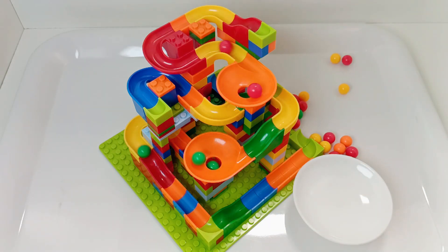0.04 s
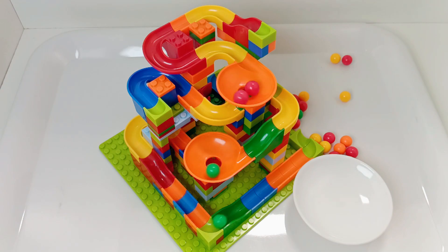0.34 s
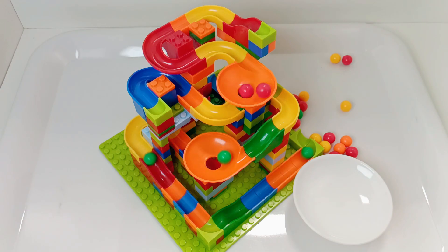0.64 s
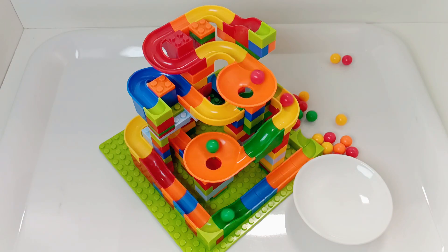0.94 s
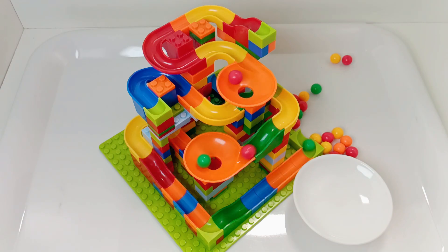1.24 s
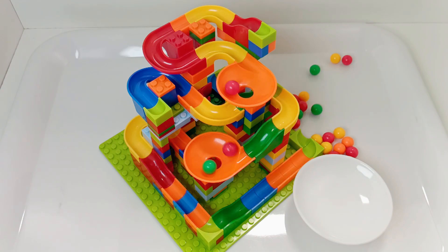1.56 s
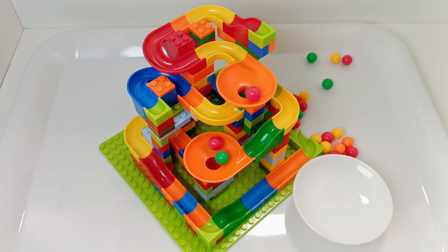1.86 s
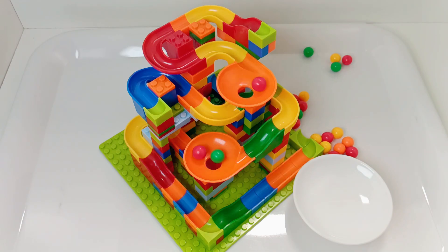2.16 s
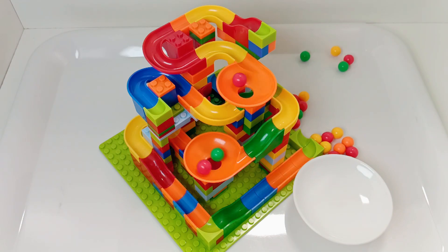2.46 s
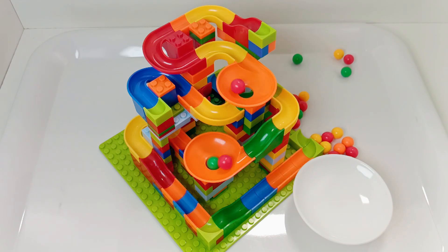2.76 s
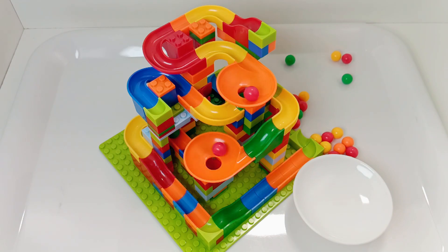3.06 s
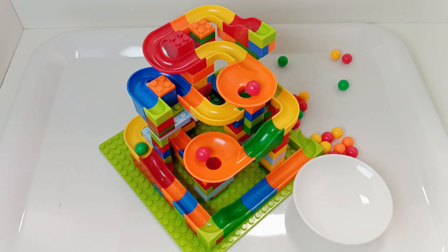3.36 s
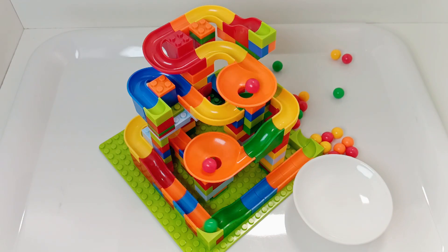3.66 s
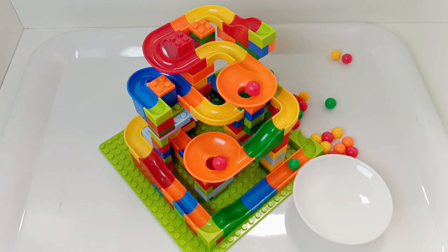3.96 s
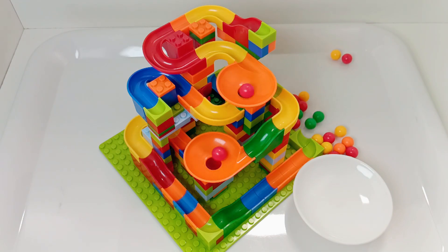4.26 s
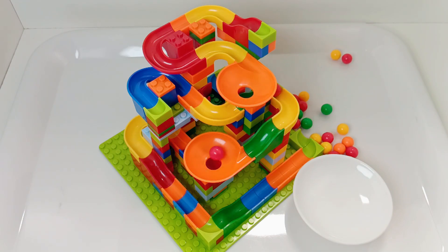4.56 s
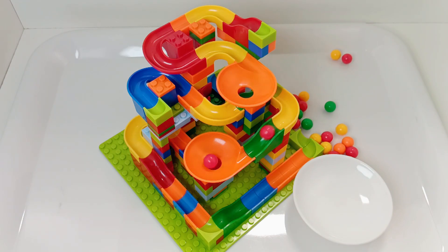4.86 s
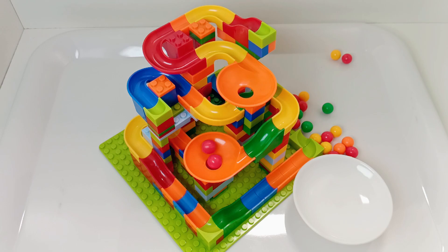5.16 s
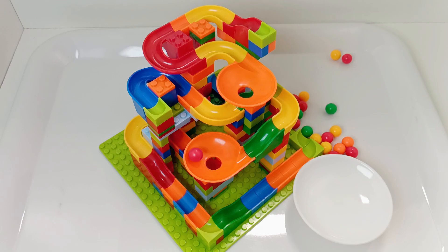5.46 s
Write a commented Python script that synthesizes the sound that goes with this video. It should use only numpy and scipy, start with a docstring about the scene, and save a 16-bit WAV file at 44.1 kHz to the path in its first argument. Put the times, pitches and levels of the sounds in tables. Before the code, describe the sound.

Light marbles run down a plastic toy tower standing in a plastic tub, heard close and slightly to the left in a small, quiet room. At the start one bounces through a funnel, and quick ticks and a rolling rattle follow along the chutes. Sharp clashes come at about 0.8 and 1.35 seconds, and marbles hit a heap with a brief buzzing crash at 0.9 and 1.5 seconds. From 1.7 to 2.7 seconds there is only soft circling with faint ticks. Near 2.9 seconds a marble clatters through a funnel, and the ticking grows busy again until another crash into the heap at 4.3 seconds. A few hard, bright knocks at 4.5 to 4.7 seconds mark a drop through a funnel hole. From 5 seconds marbles whirl and clack together, with one more fall at 5.3. Underneath, the hollow plastic hums faintly.

```python
"""In a small room, light marbles run down a plastic toy tower that stands in a plastic tub.
They circle and clash in the funnels, tick over the joints of the chutes, drop through a funnel's hole
and shoot into a heap of marbles that buzzes on the tub's floor. Each knock makes the plastic ring at
its own pitches (its modes). Rolling is a stream of tiny bumps that shakes the same plastic.
Underneath, the walls whirr, the hollow blocks hum and the tub booms faintly."""
import sys
import numpy as np
from scipy import signal
from scipy.fft import rfft, irfft
from scipy.io import wavfile
from scipy.ndimage import uniform_filter1d, map_coordinates

SR = 44100
rng = np.random.default_rng(int(sys.argv[2]) if len(sys.argv) > 2 else 0)


def dump(signal):
    """Clip the signal to [-1, 1] and save it as 16-bit WAV at the path in sys.argv[1]."""
    limited = np.clip(np.atleast_2d(signal).T, -1, 1)
    pcm = np.round(limited * 32767).astype(np.int16)
    wavfile.write(sys.argv[1], SR, pcm)


N = 247401
RING_SIZE, KNOCK_SIZE = int(.2 * SR), int(.012 * SR)   # samples in a whole knock, and in its first snap
TIME = np.arange(N) / SR
AGE = np.arange(RING_SIZE) / SR   # seconds since a knock
# Four ranges of pitch, low to high, called body, clack, crack and sparkle.
BANDS = [signal.butter(4, 2200, "low", fs=SR, output="sos"),
         signal.butter(3, [2200, 5000], "band", fs=SR, output="sos"),
         signal.butter(4, [5000, 8000], "band", fs=SR, output="sos"),
         signal.butter(8, 8000, "high", fs=SR, output="sos")]


# Marbles clash in a funnel. Level is the clack's; hardness is clack over body, crack is crack over
# clack, sparkle is sparkle over crack, pan is left over right. The struck spot has a low and a high note.
# start_s, level_db, hardness_db, crack_db, sparkle_db, pan_db, low_hz, low_db, high_hz, high_db
FUNNEL_CLASHES = [(0.788, -25, 4.5, -15.5, 4, 2.5, 1214, -1, 3960, -2),
                  (0.805, -24, 4.5, -4.5, -8, 5.5, 1236, -1, 4020, 4),
                  (1.344, -31.5, 2.5, 2.5, -4.5, 3, 2660, 6, 5120, -2),
                  (1.355, -21.5, 13, -20, -5, 7.5, 2636, 25, 3300, -7),
                  (2.155, -44.5, -3.5, -8.5, -19, 4, 2360, 12, 5050, -2),
                  (2.573, -48, 3, -16.5, -24, 6.5, 2360, 14, 4120, -1),
                  (2.782, -52.5, 2, -15, 9, 10, 1520, 8, 3340, 19),
                  (2.824, -43.5, 2, -2.5, -2.5, 14, 1833, 1, 5880, -9),
                  (2.836, -38.5, 7, -0.5, -8, 18, 1920, 20, 5870, -8),
                  (3.019, -40, 4, -15, -13, 4, 2590, 9, 3524, 10),
                  (5.025, -43.5, 2, 1.5, -8, 1, 1565, 10, 5090, 13.5),
                  (5.112, -40, -2, -25, -1, 2, 1560, 26, 3415, 10),
                  (5.132, -44.5, -4, 0.5, -6.5, 6, 1492, 28, 5100, 11),
                  (5.162, -41.5, 8, -11, 0, -2, 1390, 12, 3180, 11),
                  (5.186, -32.5, 0, -3.5, -4.5, 3, 1907, 11, 5360, -1),
                  (5.302, -42, 23, 1, -5.5, 1, 3100, -3, 3440, 23),
                  (5.428, -35, 11, -8, -9, 6, 2685, 7, 3400, 4),
                  (5.457, -33, 7.5, -6.5, -5, 3, 2690, -6, 4085, 2),
                  (5.495, -38, 3, -5, -8.5, 2.5, 2630, 4, 3427, -4),
                  (5.542, -38, -2, -6.5, -10, 5.5, 1900, 3, 4380, 8),
                  (5.561, -34.5, 1, -19, -17, 1, 1724, 1, 4040, 7)]
# Falls through the lower funnel:
# start_s, level_db, rebound_after_s, rebound_db, last_bounce_after_s, last_bounce_db, pan_db
FUNNEL_FALLS = [(0.067, -27.5, 0.016, -23.5, 0.049, -29, 4), (2.868, -28.5, 0.0075, -26.5, 0.047, -23.5, 5),
                (5.339, -29, 0.0155, -23.5, 0.052, -27.5, 1)]
# The four touches of a fall: hardness_db, crack_db, sparkle_db, low_hz, low_db, high_hz, high_db
FALL_TOUCHES = [(2, -4.5, -4, 1900, -3.5, 3480, -9), (3, -4.5, -5.5, 1880, -4.5, 3480, 8.5),
                (6, -7.5, -2, 2680, -1.5, 7600, 11), (8, -4.5, -8.5, 2690, -8, 3800, 9)]
# A funnel's main modes (wider ones die sooner): pitch_hz, base_width_hz, level_db
FUNNEL_MODES = [(928, 27, -3.5), (1359, 28, 0), (1497, 35, -5), (1582, 30, -0.5), (1808, 65, 4),
                (1929, 81, 4), (2226, 50, -12.5), (2650, 44, -8), (3260, 32, -5.5), (3413, 60, 5),
                (3490, 50, 3), (3810, 37, -11.5), (4080, 23, -5), (5030, 55, -18.5), (5560, 50, -11.5),
                (5500, 65, -17), (6940, 90, -7), (9700, 120, -22)]
# Its crowd of weaker modes, heard as one tone colour: pitch_hz, level_db
FUNNEL_COLOUR = [(180, -62.5), (300, -26), (555, -28), (930, -17.5), (1170, -0.5), (1900, -1), (2140, -2.5),
                 (2700, 2.5), (3030, -1.5), (3520, 2), (3890, -3), (5900, -4), (7570, -11.5), (9710, -23.5),
                 (16000, -38.5)]
def funnel_clashes():
    """Marbles clash in the funnels; a falling one lands, rebounds twice quickly and bounces once more."""
    landings = []
    for start_s, db, rebound_s, rebound_db, last_s, last_db, pan_db in FUNNEL_FALLS:
        touches = [(start_s, db), (start_s + rebound_s, rebound_db),
                   (start_s + rebound_s + 0.005, rebound_db), (start_s + last_s, last_db)]
        for touch, tone in zip(touches, FALL_TOUCHES):
            landings.append((*touch, *tone[:3], pan_db, *tone[3:]))
    return knocks(landings + FUNNEL_CLASHES, FUNNEL_MODES, FUNNEL_COLOUR, ripple_db=3.5, modes_db=-5.5,
                  narrowing=0.4, note_width=42, crack_fade=0.044, snap=0.19,
                  tail_db=-10.5, tail_fade_s=0.14, rise=0.0015)


# Ticks at the joints:
# start_s, level_db, hardness_db, crack_db, sparkle_db, pan_db, low_hz, low_db, high_hz, high_db
CHUTE_TICKS = [(0.026, -43.5, 0, 3.5, -3, 4, 1540, 7, 6700, 4),
               (0.2, -40.5, 4, -6.5, 4, 3, 1790, 0, 3430, -4),
               (0.251, -35.5, 2, -6.5, -7, 6, 2700, -12, 3480, 3),
               (0.285, -34.5, 4, -16, 1.5, 5, 2610, -1, 3500, -4),
               (0.332, -36.5, 0, -4.5, -4, 2, 1860, 5, 5000, 3),
               (0.355, -33.5, -1, -0.5, -10, 9, 1625, 1, 5080, 6),
               (0.376, -35.5, 5, -13, -9, 1, 1975, 2, 3480, 2),
               (0.388, -32, 8, -1.5, -12, 5.5, 2350, -16, 5710, 10),
               (0.506, -41.5, 6, -25, -14, 4, 2260, 12, 3220, 7),
               (0.541, -27.5, 11, 1.5, -7.5, 5, 2650, 1, 5990, -2.5),
               (0.653, -36.5, 9, -9, -12, 1, 2140, -2, 4280, 4),
               (0.712, -37.5, 7, -2.5, -5, 3, 2355, 17, 3820, -5),
               (0.728, -28.5, 5.5, -7.5, -2, 7, 2620, -3, 4160, -9),
               (0.74, -35.5, 0, 0, -6, 1, 2680, -2, 4070, -2),
               (0.833, -34, 10, -2, -9, 1, 2780, -13, 3880, -5),
               (0.853, -29, 0, -6.5, -9, 3.5, 2270, -7, 3110, -7),
               (1.067, -42, 10, -16, -8, 2, 2270, 11, 3420, -2),
               (1.111, -27.5, 25, -2.5, -8, 5, 2250, -1.5, 3520, -4),
               (1.185, -37.5, 4.5, -17, -9, 7, 2650, 6, 3330, 14),
               (1.249, -41.5, 16, -8, -10, 4, 2410, 16, 3725, 1),
               (1.267, -37, 7, -3.5, -14, 2.5, 2330, 9, 6000, 0),
               (1.294, -33.5, 4, -3, -8, 5, 2600, -10, 4370, 2),
               (1.416, -35.5, -1, -5, -12.5, 5, 2310, -7, 3910, 2),
               (1.661, -54.5, 11.5, -11, -10, 2, 2290, 0, 3130, 1),
               (1.929, -55.5, -8.5, -7, -17.5, 3.5, 1930, 9, 5990, 10),
               (1.962, -57.5, -13, -22, -13.5, 7, 1940, 13, 3570, 4),
               (1.975, -49.5, -9.5, -13.5, -11, 5.5, 1825, 2, 3600, 15.5),
               (2.259, -62, 10, -9.5, 3.5, -1, 1900, -3, 3620, -6.5),
               (2.378, -54.5, 3, -29.5, -9, 8.5, 2985, 14, 3020, 0),
               (2.718, -61.5, -11, -10.5, 5.5, 5.5, 1885, 12, 3450, -7),
               (3.051, -38, 3.5, -5, -20.5, 4, 2680, 10, 5200, 13),
               (3.065, -38, -2.5, -11, 1, 6, 2920, 2, 3400, 1),
               (3.097, -37, 3, -10, -7, 4, 2665, 5, 3970, -11),
               (3.136, -40.5, -6, -11, 1.5, 6, 1750, -9, 3370, -2),
               (3.155, -31.5, 5, -7, -12, 5, 1810, 2, 3340, -1),
               (3.235, -46.5, -1, -19, -4, 4.5, 2930, 8.5, 4400, 5),
               (3.317, -56.5, -6, -19, -14, 1, 2320, 12.5, 3265, -7),
               (3.364, -54.5, -3, -29, -11.5, 5.5, 2840, 10.5, 3220, 1),
               (3.458, -42.5, 3, -16.5, 7, 8, 2880, 2, 4430, 4),
               (3.485, -38.5, 1.5, -6, -12, 2.5, 1330, 6, 3310, 3),
               (3.581, -46, -8, -22, 1, 10, 1830, 15, 8200, -4),
               (3.6, -32.5, 0, -7, -1.5, 5, 2680, 23, 8340, 14),
               (3.608, -40.5, 9, -19, -11, 14, 2660, 2, 3220, 4),
               (3.676, -38.5, 8, 0, -3.5, 5.5, 2330, 10, 4180, 0),
               (3.722, -37, 7, -15, -10, 11, 2290, -3, 3750, -6),
               (3.734, -30, 16, -8.5, -14.5, 5, 2305, 12, 3640, 7),
               (3.772, -37.5, 10, -24, -20, 3, 2340, -6, 3590, 1),
               (3.79, -48, 18, -26.5, -24, -1, 2505, 12, 3560, -2),
               (3.872, -45, -2, -22, 4, 10, 2340, 17, 3750, -4),
               (3.894, -29.5, 11, -3.5, -11.5, 6, 2670, -3, 4540, -2),
               (3.964, -37, 6, -11, -13, 7, 2650, 1, 3190, 9),
               (3.982, -36.5, 5.5, -14, -20, 4, 1405, 21, 3250, 24),
               (4.012, -36.5, 9, -7.5, -9, 5, 2350, 11, 4450, 10),
               (4.066, -32.5, 5.5, -2, -12.5, 0.5, 2350, 1, 3790, 2),
               (4.096, -34.5, 0, -4.5, -7, 5, 2370, -9, 4660, 2),
               (4.113, -41, 9, -5, -10, 3, 1880, -1, 4300, 5),
               (4.147, -39, -1, -9, -6, 0, 2970, 4, 5000, -3),
               (4.161, -28.5, 16, -9, -10, 5.5, 2800, 6.5, 3280, -6),
               (4.226, -28, 1.5, -5, -9.5, 2.5, 1550, -8, 6240, -9)]
# A chute's main modes: pitch_hz, base_width_hz, level_db
CHUTE_MODES = [(1390, 35, 1), (1542, 48, 6), (1940, 85, 5.5), (2169, 40, -8.5), (2328, 35, 5.5),
               (2700, 35, 3), (2764, 16, -2), (2960, 45, 1), (3180, 69, -6.5), (3800, 50, -6.5),
               (4180, 40, -8.5), (4060, 70, -9), (5620, 95, -10.5), (5940, 150, -5), (6960, 79, -10.5)]
# Its crowd of weaker modes: pitch_hz, level_db
CHUTE_COLOUR = [(180, -78.5), (300, -67), (360, -34), (624, -47.5), (787, -10), (1100, -10), (1390, -3),
                (2360, -1.5), (2700, -3), (4300, -4.5), (5160, -14), (6000, -9.5), (8220, -17),
                (9710, -21.5), (12500, -40.5), (16000, -40)]
def chute_ticks(strays):
    """Marbles tick over the joints of the chutes; the stray ticks ring the same plastic."""
    return knocks(CHUTE_TICKS + strays, CHUTE_MODES, CHUTE_COLOUR, ripple_db=2.0, modes_db=-6,
                  narrowing=0.18, note_width=32, crack_fade=0.049, snap=0.18,
                  tail_db=-23.5, tail_fade_s=.16, rise=0.0013)


def stray_ticks(rolling_gain, count):
    """Table rows for faint ticks at random moments, stronger when the rolling is louder."""
    when, strength = rng.random((count, 2)).T
    times = (np.arange(count) + when) / count * TIME[-1]
    levels_db = 20 * np.log10(np.interp(times, TIME, rolling_gain)) - 7 + 5 * (strength - .5)
    hardness_db, crack_db, sparkle_db, pan_db = 2, -12, -12, 4
    return [(s, db, hardness_db, crack_db, sparkle_db, pan_db) for s, db in zip(times, levels_db)]


# Knocks in the upper funnel's hole:
# start_s, level_db, hardness_db, crack_db, sparkle_db, pan_db, low_hz, low_db, high_hz, high_db
HOLE_DROPS = [(4.516, -21, 16, -2.5, -5.5, 5.5, 2940, 1, 3970, -1.5),
              (4.58, -23, 15, -4, -1.5, 5, 2870, 9, 4020, -4),
              (4.61, -26, 6, -13, -3, 1.5, 2893, 13.5, 4120, -6),
              (4.666, -36.5, 13, -13.5, -5, 7, 2670, 14, 4020, -8),
              (4.864, -42, 1.5, -19, -22, 2, 1830, -3, 4010, -0.5),
              (4.877, -36, 6.5, -11.5, -17, 8, 1880, 1, 4030, -4.5),
              (4.93, -53, 6, -27, -11, -6, 3080, 21, 3300, 5)]
# The main modes of the plastic there: pitch_hz, base_width_hz, level_db
HOLE_MODES = [(1415, 30, 4), (2110, 40, 10), (2900, 90, -14), (3960, 60, 10), (4060, 50, 6.5),
              (4680, 160, 0.5), (5970, 300, 7), (6640, 200, -13), (7300, 150, -10), (9100, 120, -7),
              (9700, 120, -18)]
# Its crowd of weaker modes: pitch_hz, level_db
HOLE_COLOUR = [(180, -64.5), (300, -46), (667, -16), (1040, -20.5), (1230, -2), (2480, -6.5), (2930, -3),
               (3400, -3.5), (4100, 1.5), (5200, -8), (6800, -4.5), (8000, -17.5), (9000, -6), (9900, -7),
               (11700, -23.5), (16000, -23)]
def hole_drops():
    """A marble drops through the upper funnel with a few hard, bright knocks, then softer ones."""
    return knocks(HOLE_DROPS, HOLE_MODES, HOLE_COLOUR, ripple_db=5.0, modes_db=-9.0,
                  narrowing=0.46, note_width=59, crack_fade=0.029, snap=0.81,
                  tail_db=-14.5, tail_fade_s=0.21, rise=0.0023)


# Crashes into the heap, too crowded for a single note:
# start_s, level_db, hardness_db, crack_db, sparkle_db, pan_db
HEAP_HITS = [(0.899, -23, 1, 1, -6.5, 4), (0.953, -32, 1.5, -12, -19, 4.5), (1.457, -23.5, 1, 2, -7, 4),
             (4.269, -23, -1, 1.5, -6.5, 3), (4.37, -38.5, -1, -1.5, -12.5, 4.5)]
# The main modes that a crash rings: pitch_hz, base_width_hz, level_db
HEAP_MODES = [(1090, 48, -8.5), (1513, 100, 11), (1970, 100, 5), (2310, 70, 3.5), (2990, 90, -7),
              (3880, 150, -3), (5450, 120, -3.5), (6370, 150, 7.5)]
# The crowd of weaker modes: pitch_hz, level_db
HEAP_COLOUR = [(180, -47), (300, -31.5), (392, -15.5), (546, -23), (978, 3), (1100, -2.5), (1560, 7),
               (2200, 4.5), (3080, 3), (4600, 0), (6500, -1.5), (8000, -1.5), (10500, -16), (12700, -16),
               (15200, -21), (16000, -28)]
def heap_crashes():
    """A marble hits the heap; the jostled marbles buzz on the tub's floor and each other, then settle."""
    settling = np.exp(-(AGE / 0.075) ** 2)
    buzz = from_db(-14.5) * chatter(bounce_s=0.0028, rough_db=3.0) * settling
    return knocks(HEAP_HITS, HEAP_MODES, HEAP_COLOUR, ripple_db=0.0, modes_db=-10.0, narrowing=0.36,
                  crack_fade=0.047, snap=0.9, tail_db=-36.5, tail_fade_s=.25, rise=0.002, buzz=buzz)


def knocks(table, modes, colour, ripple_db, modes_db, narrowing, crack_fade, snap,
           tail_db, tail_fade_s, rise, note_width=None, buzz=0):
    """A knock is a burst of crowded modes, the main modes, any spot notes and a tail from the tower."""
    out = np.zeros((2, N + RING_SIZE))
    # A brief boost for each upper band: the treble is spent soonest.
    snaps = (1, 1 + 0.045 * snap * dying(0.039), 1 + snap * dying(0.047), 1 + (1 + snap) * dying(0.019))
    tail = from_db(tail_db) * dying(tail_fade_s)
    for start_s, level_db, hardness_db, crack_db, sparkle_db, pan_db, *spot in table:
        bands_db = level_db + np.array([-hardness_db, 0, crack_db, crack_db + sparkle_db])
        # A weak or soft, glancing blow builds up more slowly and lingers.
        stretch = np.interp(max(bands_db), [-45, -27], [1.7, 1])
        stretch *= np.interp(hardness_db, [0, 16], [1.25, 0.9])
        onset = 1 - np.exp(-(AGE / (rise * stretch)) ** 2)
        fade = np.sqrt(dying(crack_fade * stretch) ** 2 + tail ** 2 + buzz ** 2)
        noise = rng.standard_normal((2, RING_SIZE))
        crowd = rms_one(noise * fade * chatter(bounce_s=0.0016, rough_db=-1.5))
        burst = crowd + spot_notes(spot, note_width)
        shell = rms_one(coloured(burst, spot_colour(colour, ripple_db, count=110)))
        knock = onset * (shell + from_db(modes_db) * ringing(modes, narrowing, scatter_db=8.5))
        at = round(start_s * SR)
        for band, db, sharpen, lean_db in zip(BANDS, bands_db, snaps, (.5, 0.22, -1.0, -1.0)):
            part = signal.sosfilt(band, knock + 1e-18) * sharpen
            strength = from_db(db) / part[:, :KNOCK_SIZE].std()
            out[:, at:at + RING_SIZE] += strength * part * panned(pan_db + lean_db)
    return out[:, :N]


def ringing(modes, narrowing, scatter_db):
    """Modes ring after one touch; the spot touched sets each one's strength and phase at either ear."""
    hz, width, db = np.transpose(modes)[:, :, None]
    width = np.clip(width * narrowing, 14 + hz / 220, 400)   # plastic damps its high modes quickly
    strength = from_db(db + scatter_db * rng.standard_normal((len(hz), 2))) * width
    phases = rng.random((len(hz), 1)) + rng.random((len(hz), 2)) / 2
    age = AGE[:RING_SIZE // 2]
    fading_tones = np.exp((2j * np.pi * hz - np.pi * width) * age)
    rings = ((strength * np.exp(2j * np.pi * phases)).T @ fading_tones).real
    return rms_one(np.pad(rings, ((0, 0), (0, RING_SIZE - len(age)))))


def spot_notes(spot, base_width):
    """Each note of the struck spot is a short hollow knock and a longer ping; high pings die sooner."""
    share = 1000 / (SR / 2)   # a note of 0 dB is about as strong as 1 kHz of the crowd around it
    notes = 0
    for hz, db in zip(spot[::2], spot[1::2]):
        ping = ringing([(hz, base_width * np.sqrt(hz / 2000), 0)], narrowing=1.0, scatter_db=2.0)
        knock = from_db(-1.5) * ringing([(hz, 170, 0)], narrowing=0.92, scatter_db=1.5)
        notes += from_db(db) * np.sqrt(share) * (ping + knock)
    return notes


def spot_colour(colour, ripple_db, count):
    """Every spot on the plastic favours different pitches, most of all in the treble."""
    hz, db = np.transpose(colour)
    grid = np.geomspace(hz[0], hz[-1], count)
    ripple = ripple_db * np.interp(grid, [1000, 8000], [0.6, 1.4]) * rng.standard_normal(count)
    return np.column_stack([grid, np.interp(np.log(grid), np.log(hz), db) + ripple])


def chatter(bounce_s, rough_db):
    """A light marble never lands just once: the contact flutters in tiny bounces."""
    return from_db(rough_db * np.interp(AGE / bounce_s, np.arange(512), rng.standard_normal(512)))


# Marbles circling in the funnels: time_s, level_db, brightness_db
FUNNEL_CIRCLING = [(0, -37, -2.5), (0.22, -46, 2), (0.38, -40.5, -20), (0.55, -47.5, 1), (1.2, -53, 0.5),
                   (1.55, -41, -19), (1.7, -51.5, -7), (2.1, -54.5, -14.5), (2.72, -59, -13),
                   (2.85, -43, -4), (3.02, -56.5, 7.5), (3.28, -55, -13.5), (3.85, -55, -41),
                   (4.33, -45, 1), (4.5, -44.5, 2.5), (4.7, -47, -1.5), (4.82, -59.5, -11),
                   (4.96, -60, -4.5), (5.0, -44.5, -9), (5.07, -44, -13), (5.27, -40.5, -2.5),
                   (5.48, -46, 6), (5.61, -60, 8.5)]
# The tone colour of a funnel under a rolling marble: pitch_hz, level_db
FUNNEL_ROLL_COLOUR = [(180, -54.5), (300, -33.5), (555, -24), (800, -18), (1100, -8.5), (1500, -2.5),
                      (1900, -5.5), (2300, 2.5), (3000, 0), (3480, 3.5), (3950, -25), (5900, -7.5),
                      (7570, -14.5), (9710, -13.5), (16000, -40)]
def funnel_roll(gain):
    """Marbles roll smoothly round the funnels; the tighter and faster they whirl, the brighter it is."""
    plastic = rolling(FUNNEL_MODES, FUNNEL_ROLL_COLOUR, modes_db=0, narrowing=0.9,
                      bumps_per_s=800, fade_s=0.04, spread_db=2.5, surge_db=2.0)
    plastic = swirl(plastic, turns_per_s=1.6, echo_s=0.001593, swing_s=.0003, echo_gain=0.7)
    brightness_db = curve(FUNNEL_CIRCLING, column=2)
    crack_db = -5.5 + brightness_db + 0.83 * 20 * np.log10(gain / gain.max())
    return balance_roll(plastic, gain, clack_db=brightness_db, crack_db=crack_db, sparkle_db=-10.5)


# Runs down a chute, over hollow blocks: start_s, end_s, end_level_db, block_pitch_hz, growth_db_per_s
CHUTE_RUNS = [(0.57, 0.85, -37, 779, 57), (1.059, 1.37, -41, 758, 52), (3.56, 3.79, -51, 419, 4),
              (3.849, 4.146, -49.5, 816, 8), (4.53, 4.67, -49, 520, 5)]
def chute_runs():
    """How strongly the chutes are shaken: each run grows as its marble gathers speed."""
    return sum(swells([(start, end, db)], attack_s=0.031, growth_db_per_s=growth, release_s=0.018)
               for start, end, db, _, growth in CHUTE_RUNS)


def chute_roll(gain):
    """Marbles rattle jerkily down the chutes, and very faintly through the bends."""
    plastic = rolling(CHUTE_MODES, CHUTE_COLOUR, modes_db=1.0, narrowing=0.7,
                      bumps_per_s=330, fade_s=0.035, spread_db=3.2, surge_db=3.5)
    plastic = swirl(plastic, turns_per_s=1.4, echo_s=0.0026, swing_s=0.0006, echo_gain=0.29)
    in_bend = from_db(-38) * swells(BEND_PASSES, attack_s=0.03, growth_db_per_s=28, release_s=0.065)
    return balance_roll(plastic, gain + in_bend, clack_db=6.0, crack_db=-15, sparkle_db=-11.5)


def rolling(modes, colour, modes_db, narrowing, bumps_per_s, fade_s, spread_db, surge_db):
    """Tiny random bumps shake the plastic; as the marbles move on, its modes swell, fade and slide."""
    sizes = from_db(spread_db * np.minimum(rng.exponential(1, N), 4)) * rng.choice([-1, 1], N)
    bumps = (rng.random(N) < bumps_per_s / SR) * sizes * from_db(surge_db * drift(60))
    crowd = 0
    for _ in range(3):   # three spots on the plastic
        burst = rng.standard_normal((2, RING_SIZE)) * dying(fade_s)
        shell = rms_one(coloured(burst, spot_colour(colour, ripple_db=2.5, count=70)))
        nearness = from_db(6 * drift(12))
        crowd += signal.oaconvolve((bumps * nearness)[None], shell, axes=1)[:, :N]
    rings = np.zeros((2, N))
    for hz, width, db in modes:
        width_hz = np.clip(width * narrowing, 12 + hz / 200, 300)
        ring = resonance(bumps, hz, width_hz) * from_db(db + 5.5 * drift(14))
        rings += [ring, np.roll(ring, rng.integers(-14, 15))]   # each mode has its own lag between ears
    # The marble's weight retunes the wall under it, so the pitches slide by about 2 percent.
    position = np.cumsum(1 + 0.02 * drift(9))
    rings = np.array([map_coordinates(side, [position], order=3, mode="wrap") for side in rings])
    return rms_one(rms_one(crowd) + from_db(modes_db) * rms_one(rings))


def swirl(x, turns_per_s, echo_s, swing_s, echo_gain):
    """As a marble rounds a funnel or a bend, the echo off the wall comes sooner and later."""
    delay = echo_s + swing_s * np.sin(2 * np.pi * turns_per_s * TIME)
    return rms_one(x + echo_gain * np.array([np.interp(TIME - delay, TIME, side) for side in x]))


def balance_roll(plastic, gain, clack_db, crack_db, sparkle_db):
    """Even out each band of a rolling sound, then set its level; the lows lean furthest left."""
    out = 0
    bands_db = (0, clack_db, crack_db, crack_db + sparkle_db)
    for band, db, pan_db in zip(BANDS, bands_db, (11.0, 4.9, 2.5, 2.5)):
        part = signal.sosfilt(band, plastic)
        even = part / np.sqrt(uniform_filter1d(part ** 2, size=3000, axis=1) + 1e-9)
        out += gain * from_db(db) * even * panned(pan_db)
    return out


# A marble rounds a bend: start_s, end_s, end_level_db, entry_pitch_hz, exit_pitch_hz
BEND_PASSES = [(0.33, 0.49, -50.5, 1026, 977), (0.6, 0.72, -47, 2415, 2230),
               (1.68, 1.745, -48.5, 1367, 1182), (2.63, 2.69, -56.5, 1480, 1580),
               (3.04, 3.12, -47, 940, 760), (3.18, 3.39, -46, 1052, 960), (4.69, 4.75, -53.5, 2000, 1574),
               (4.96, 5.02, -44.5, 1830, 2000), (5.04, 5.14, -46, 1000, 1550),
               (5.42, 5.54, -41.5, 1010, 920)]
def wall_whirr(in_funnel, in_chute):
    """The wall under a marble whirrs: low in a funnel, higher in a chute, sliding through a bend."""
    after_fall = shaking_after(FUNNEL_FALLS, attack_s=0.0026, hold_s=0.011, release_s=0.096)
    shaken = from_db(-16.5) * in_funnel + from_db(-9) * after_fall
    funnel = shaken * shaken_note(hz=np.full(N, 941), width_hz=130)
    chute = from_db(-6.5) * in_chute * shaken_note(hz=np.full(N, 1260), width_hz=130)
    bends = np.array(BEND_PASSES)
    bend_hz = np.interp(TIME, bends[:, :2].ravel(), bends[:, 3:].ravel())
    in_bend = swells(BEND_PASSES, attack_s=0.039, growth_db_per_s=12, release_s=0.022)
    return funnel + chute + in_bend * shaken_note(bend_hz, width_hz=130)


# The weaker notes of the hollow blocks: pitch_hz, level_db
BLOCK_COLOUR = [(120, -1), (230, -6), (340, 8.5), (480, -4.5), (700, 8), (900, -21), (1300, -45)]
def hollow_blocks(in_funnel, in_chute):
    """Shaken hollow blocks hum in lumps, with wandering notes over a soft spread of weaker ones."""
    after_crash = shaking_after(HEAP_HITS, attack_s=0.12, hold_s=0.081, release_s=0.009)
    tower = from_db(-49.0) * (in_funnel / in_funnel.max()) ** 1.67 + from_db(-30.0) * after_crash
    chute = from_db(-13.5) * in_chute
    runs = np.array(CHUTE_RUNS)
    block_hz = np.interp(TIME, runs[:, :2].ravel(), np.repeat(runs[:, 3], 2))
    wander_hz = 25.13 * drift(5)
    notes = tower * shaken_note(746 + wander_hz, width_hz=70)
    notes += chute * shaken_note(block_hz + wander_hz, width_hz=87)
    spread = from_db(-8.5) * rms_one(coloured(rng.standard_normal((2, N)), BLOCK_COLOUR))
    lumps = from_db(4.5 * drift(25))
    return lumps * (notes + (tower + chute) * spread) * panned(6.0)


# Booms of the tub's floor: start_s, end_s, end_level_db
TUB_BOOMS = [(0.6, 0.85, -62.5), (1.03, 1.08, -67), (1.28, 1.44, -67), (2.19, 2.3, -71.5), (2.8, 2.86, -66),
             (3.36, 3.44, -76), (4.04, 4.42, -66)]
# The floor's deep tone colour: pitch_hz, level_db
TUB_COLOUR = [(20, -30.5), (38, -21.5), (60, -14.5), (75, 8.5), (88, -5), (110, -9.5), (140, -14.5),
              (200, -15.5), (300, -35.5), (500, -66.5)]
def tub_boom():
    """The tub's floor murmurs under the tower and now and then booms, nearly alike at both ears."""
    middle, side = coloured(rng.standard_normal((2, N)), TUB_COLOUR)
    murmur = from_db(-79.0 + 7.5 * drift(23))
    booms = swells(TUB_BOOMS, attack_s=0.032, growth_db_per_s=-12.0, release_s=0.016)
    return (murmur + booms) * rms_one(middle + from_db(-24.0) * side * [[1], [-1]])


# The quiet room's tone colour: pitch_hz, level_db
ROOM_COLOUR = [(60, -32), (130, 3.5), (220, -10.5), (450, -19.5), (900, -6.5), (1800, -0.5), (4400, -29.5),
               (10000, -33.5), (16000, -37.5)]
def room_hush():
    """A very faint, steady noise fills the room."""
    return from_db(-65.5) * rms_one(coloured(rng.standard_normal((2, N)), ROOM_COLOUR))


def room_echo(x, echo_db, fade_s, dull_hz):
    """The small room adds a faint, dull echo that builds up and dies away quickly."""
    tail = rng.standard_normal((2, RING_SIZE)) * dying(fade_s) * (1 - dying(0.021))
    tail = signal.sosfilt(signal.butter(2, dull_hz, fs=SR, output="sos"), tail)
    tail /= np.sqrt(np.sum(tail ** 2, axis=1, keepdims=True))
    return x + from_db(echo_db) * signal.fftconvolve(x, tail, axes=1)[:, :N]


def shaken_note(hz, width_hz):
    """A steadily shaken mode: a narrow band of noise that follows a pitch, partly alike at both ears."""
    shaking = rng.standard_normal((3, N)) + 1j * rng.standard_normal((3, N))
    smoothing = signal.butter(2, width_hz / 2, fs=SR, output="sos")
    flutter = signal.sosfilt(smoothing, shaking[0] + 1.53 * shaking[1:])
    return rms_one((flutter * np.exp(2j * np.pi * np.cumsum(hz) / SR)).real)


def resonance(x, hz, width_hz):
    """One mode: it lets its own pitch through at full strength and weakens the rest."""
    r = np.exp(-np.pi * width_hz / SR)
    feedback = [1, -2 * r * np.cos(2 * np.pi * hz / SR), r * r]
    return signal.lfilter(np.array([1, 0, -1]) * (1 - r * r) / 2, feedback, x)


def coloured(x, colour):
    """Give a sound a tone colour, with no ringing ahead of a knock (a minimum-phase filter)."""
    size = 2048
    hz, db = np.transpose(colour)
    grid = np.maximum(np.fft.rfftfreq(2 * size, 1 / SR), 1)
    cepstrum = irfft(np.log(from_db(np.interp(np.log(grid), np.log(hz), db))))
    cepstrum[1:size] *= 2
    cepstrum[size + 1:] = 0
    response = irfft(np.exp(rfft(cepstrum)))[:size]
    return signal.fftconvolve(x, response[None], axes=1)[:, :x.shape[1]]


def swells(rows, attack_s, growth_db_per_s, release_s):
    """Loudness over time: each row sets in, grows or sinks until its end, then dies away."""
    gain = 0
    for start_s, end_s, db, *_ in rows:
        fade_in = np.clip((TIME - start_s) / attack_s, 0, 1)
        fade_out = np.exp(-np.maximum(TIME - end_s, 0) / release_s)
        gain += from_db(db + growth_db_per_s * np.minimum(TIME - end_s, 0)) * fade_in * fade_out
    return gain


def shaking_after(blows, attack_s, hold_s, release_s):
    """How strongly the plastic shakes after each blow."""
    return swells([(s, s + hold_s, db) for s, db, *_ in blows], attack_s, 0, release_s)


def drift(turns_per_s):
    """A smooth random wobble, about 1 in size."""
    coarse = TIME[::64]
    wobble = map_coordinates(rng.standard_normal(2048), [coarse * turns_per_s], order=3, mode="wrap")
    return np.interp(TIME, coarse, rms_one(wobble))


def curve(table, column):
    """Join one column's points with straight lines over time."""
    columns = np.transpose(table)
    return np.interp(TIME, columns[0], columns[column])


def dying(fade_s):
    """A fade that falls by 60 dB in fade_s seconds."""
    return np.exp(-np.log(1000) * AGE / fade_s)


def panned(pan_db):
    """Left and right gains; above 0 dB the sound leans left."""
    return rms_one(from_db(np.array([[pan_db], [-pan_db]]) / 2))


def from_db(db):
    """Turn decibels into a gain to multiply by."""
    return 10 ** (np.asarray(db) / 20)


def rms_one(x):
    """Scale to an average strength (rms) of 1."""
    return x / np.sqrt(np.mean(x ** 2) + 1e-20)


def scene():
    """Knocks and rolling over the hum of the tower, the boom of the tub and a quiet room."""
    in_funnel = from_db(curve(FUNNEL_CIRCLING, column=1))
    in_chute = chute_runs()
    strays = stray_ticks(in_funnel ** 2 / in_funnel.max() + in_chute, count=40)
    hits = funnel_clashes() + chute_ticks(strays) + hole_drops() + heap_crashes()
    roll = funnel_roll(in_funnel) + chute_roll(in_chute)
    hum = wall_whirr(in_funnel, in_chute) + hollow_blocks(in_funnel, in_chute)
    background = tub_boom() + room_hush()
    return room_echo(hits, echo_db=-12.0, fade_s=0.19, dull_hz=5240) + roll + hum + background


# The right microphone's tone colour against the left's: pitch_hz, level_db
RIGHT_MIC_COLOUR = [(500, -0.5), (950, -4), (1300, 1), (2000, -5), (8000, 4.5), (13000, 1)]
def record(dry):
    """Both microphones dip near 13 kHz and lift near 15 kHz; the right adds a colour; the top is cut."""
    both = coloured(dry, [(1000, -4.5), (10500, -1.0), (13200, -8.5), (15000, 2.5), (16000, 4.0)])
    both = np.vstack([both[:1], coloured(both[1:], RIGHT_MIC_COLOUR)])
    return signal.sosfilt(signal.ellip(10, .2, 80, 15900, fs=SR, output="sos"), both)


dry = scene()
out = record(dry)
dump(out)
```